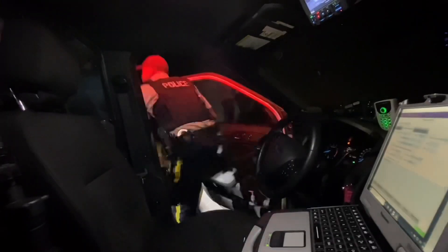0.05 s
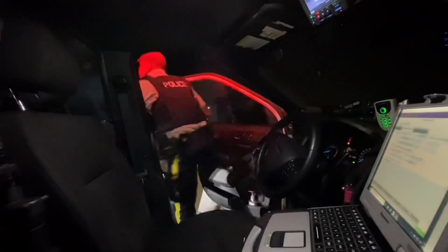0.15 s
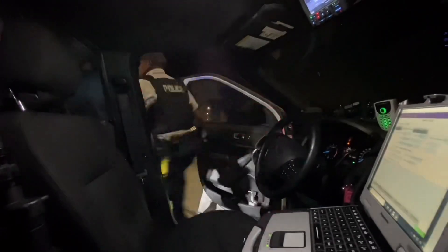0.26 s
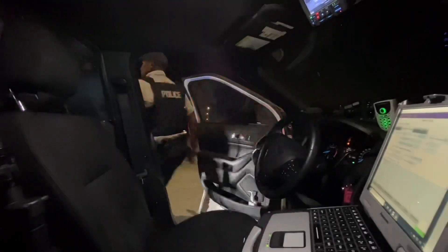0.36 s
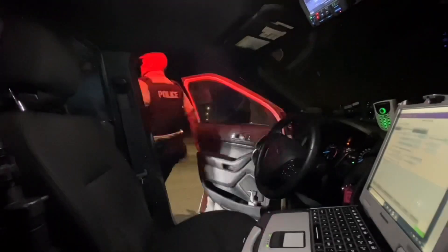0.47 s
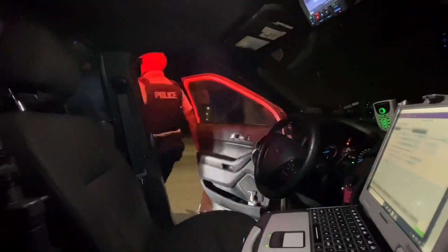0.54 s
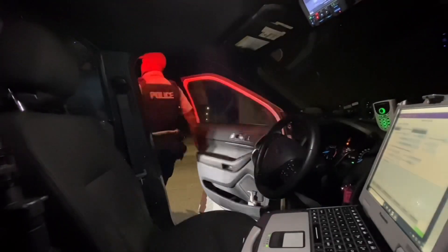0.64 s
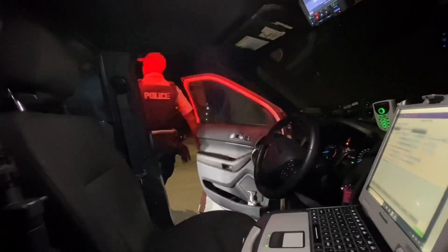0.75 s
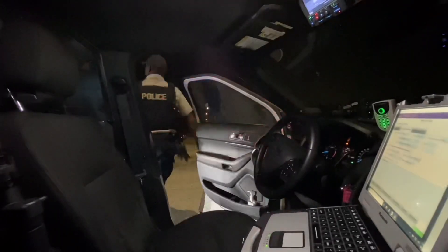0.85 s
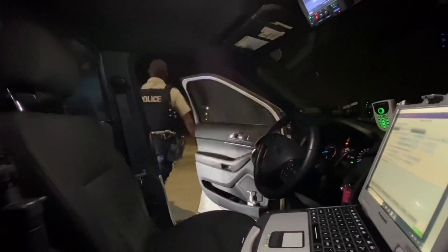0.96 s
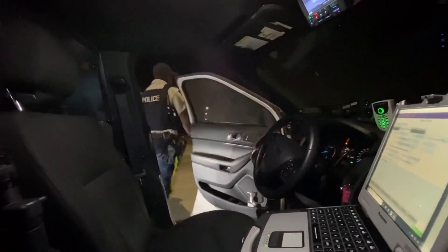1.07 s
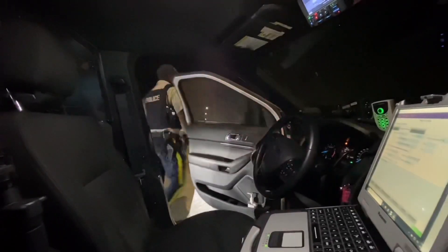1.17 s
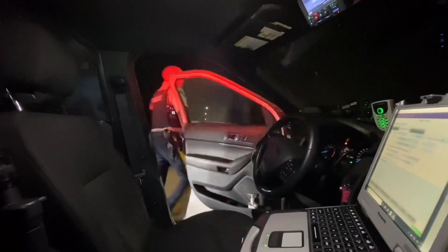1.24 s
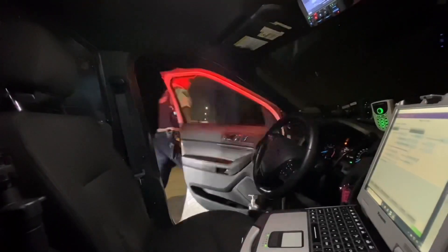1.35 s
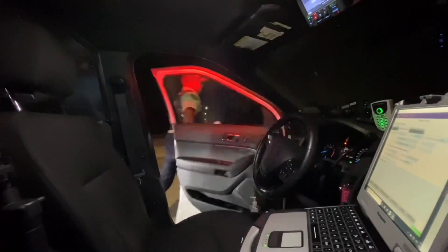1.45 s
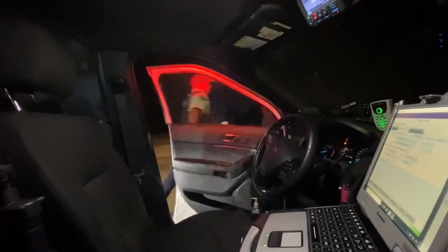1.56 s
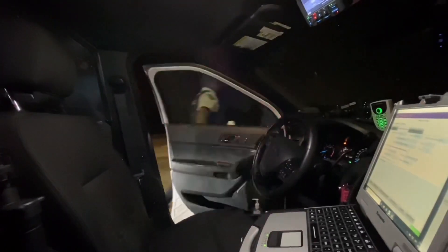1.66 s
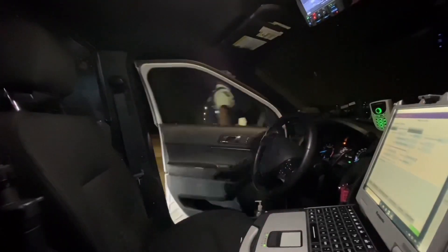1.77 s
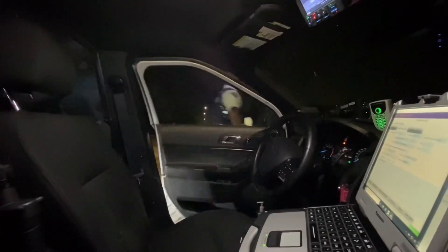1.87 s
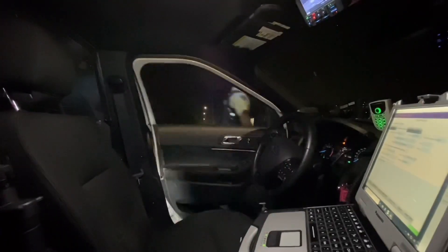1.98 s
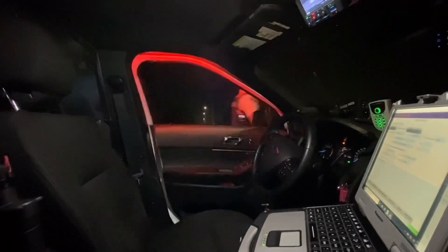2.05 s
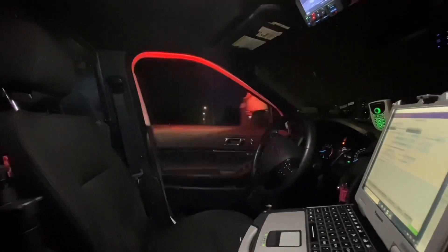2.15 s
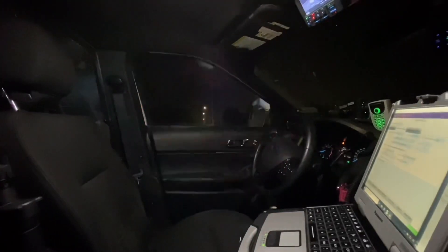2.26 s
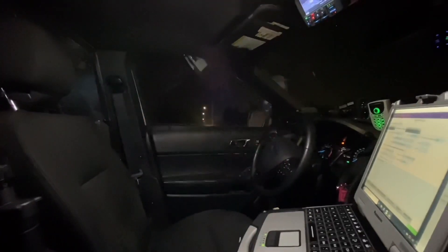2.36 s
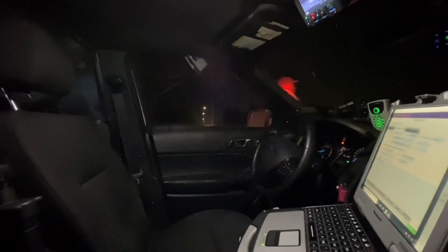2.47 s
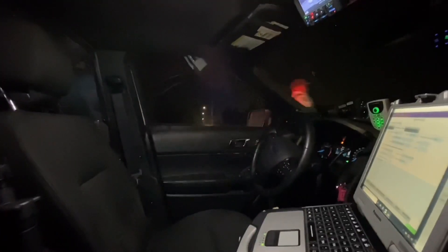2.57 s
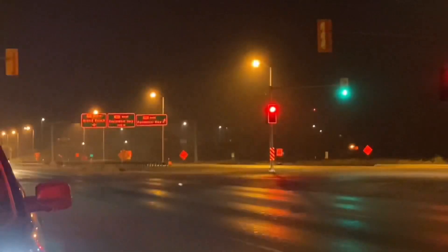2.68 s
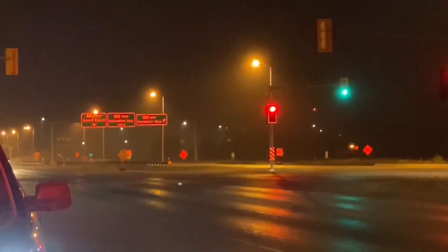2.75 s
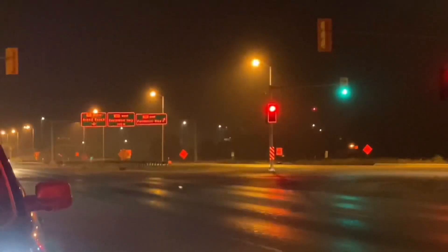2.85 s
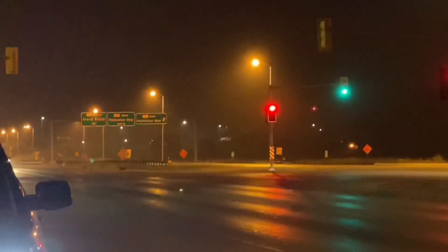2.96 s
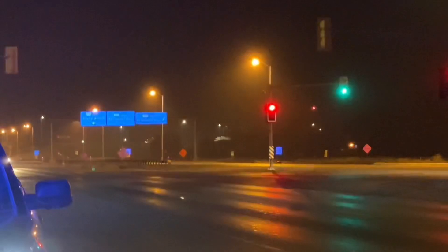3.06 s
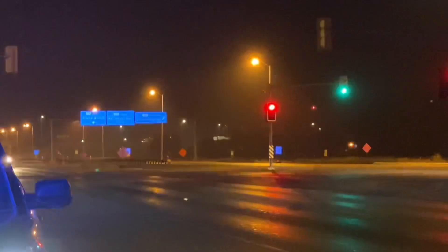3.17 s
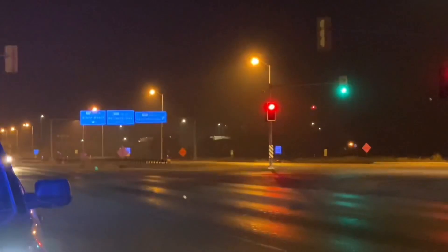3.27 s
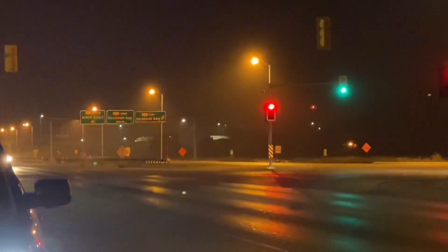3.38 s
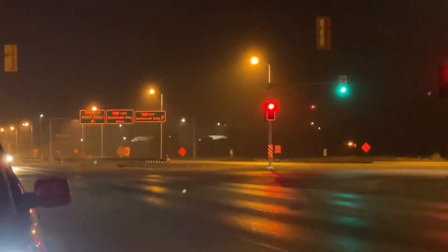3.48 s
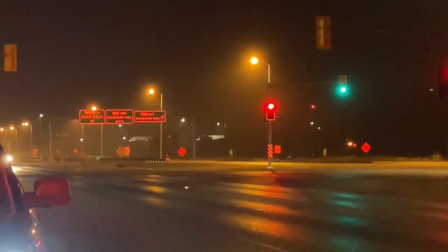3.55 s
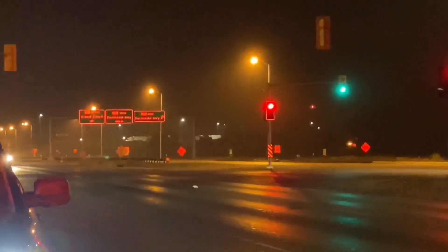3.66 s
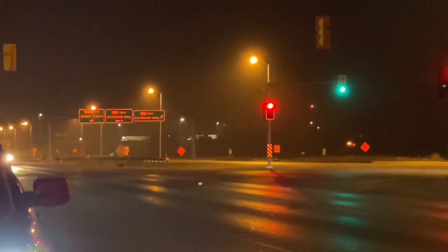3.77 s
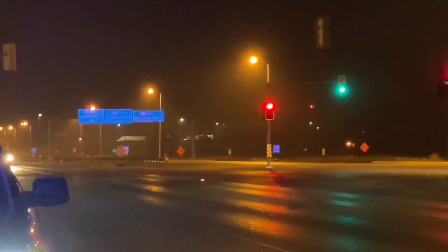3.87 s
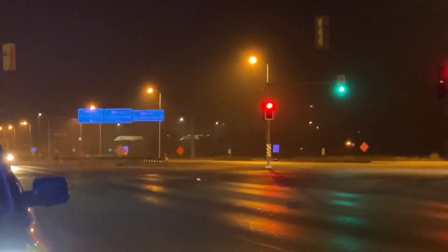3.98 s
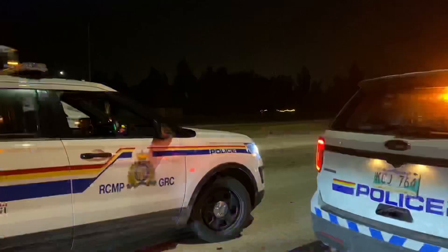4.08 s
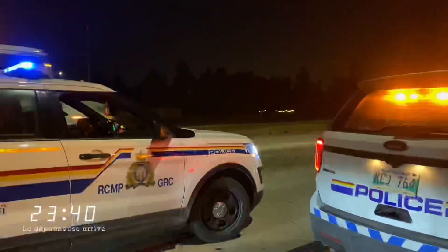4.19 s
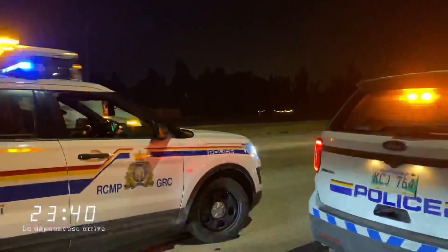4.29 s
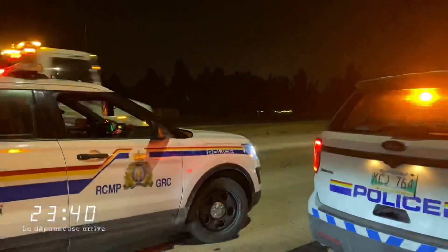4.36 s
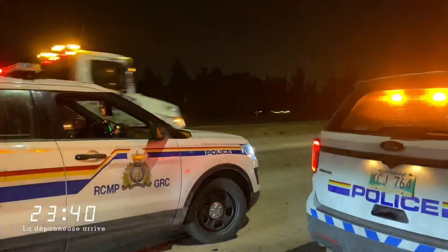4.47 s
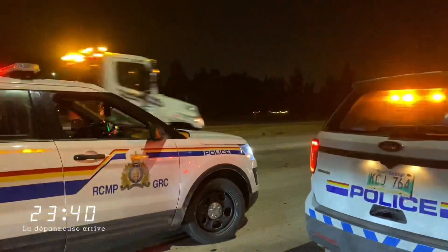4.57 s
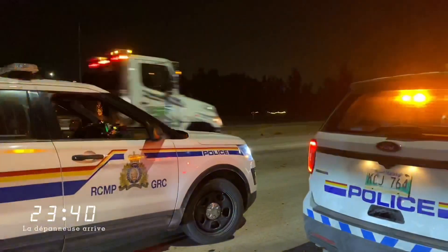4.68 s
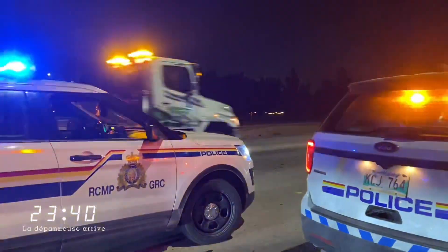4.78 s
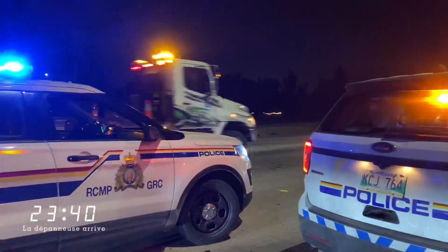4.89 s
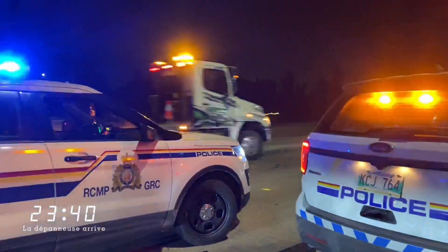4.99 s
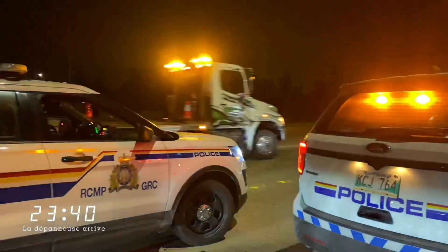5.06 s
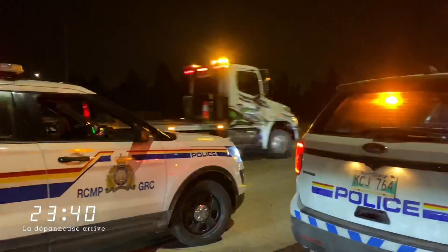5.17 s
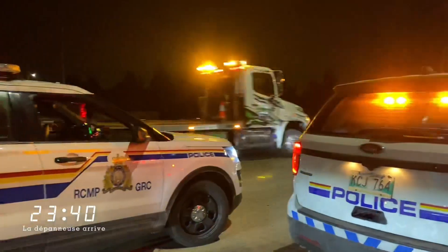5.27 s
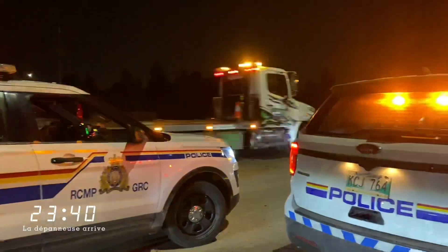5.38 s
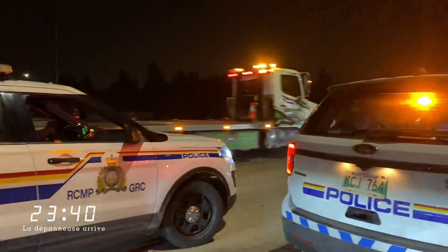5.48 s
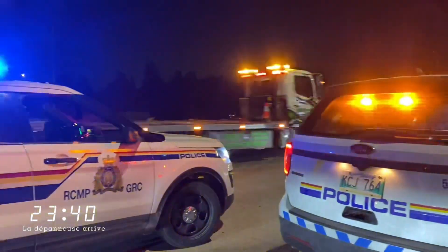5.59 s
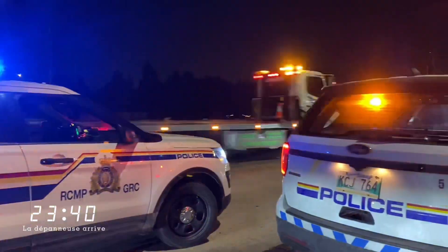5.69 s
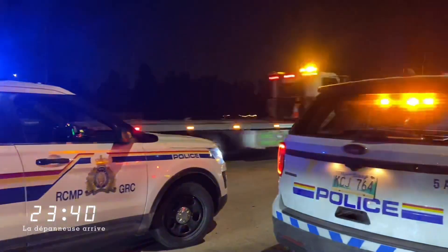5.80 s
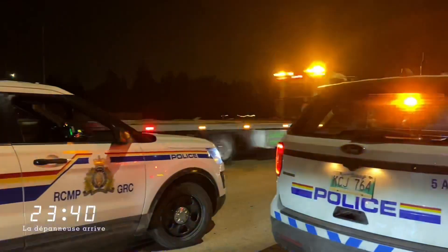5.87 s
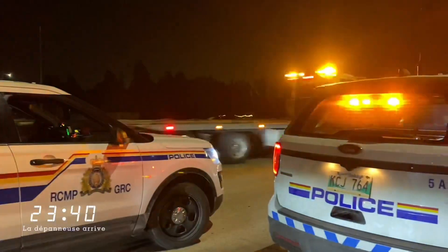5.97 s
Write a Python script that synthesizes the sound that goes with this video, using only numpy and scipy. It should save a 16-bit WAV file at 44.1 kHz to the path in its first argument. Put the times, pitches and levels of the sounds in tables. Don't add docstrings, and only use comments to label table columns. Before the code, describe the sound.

Inside a parked car at night, wet road noise comes through the open door on the right with small gear clicks and cloth scuffs. The door slams with a latch crash, deep boom and rattling trim and glass. A hard cut leads to idling engines and two close hollow knocks, then another to a heavy truck growling, easing off and rolling by on hissing tyres.

```python
import sys
import numpy as np
from scipy import signal
from scipy.fft import rfft, irfft, next_fast_len
from scipy.io import wavfile
from scipy.ndimage import uniform_filter1d, map_coordinates

SR = 44100
rng = np.random.default_rng(int(sys.argv[2]) if len(sys.argv) > 2 else 0)


def magnitude_from_level(level_db):
    exponent = np.asarray(level_db, float) / 20
    return 10 ** exponent


def store_pcm(level_fs):
    pcm = np.round(np.clip(level_fs, -1, 1) * 32767).astype(np.int16)
    wavfile.write(sys.argv[1], SR, np.atleast_2d(pcm).T)


N = 266083
T = np.arange(N) / SR


def unit(x):
    return x / np.sqrt(np.mean(x ** 2) + 1e-20)


def along(points, hz):
    f, v = np.transpose(points)
    return np.interp(np.log(hz + 1), np.log(f + 1), v)


def wobble(rate):
    return map_coordinates(rng.standard_normal(int(N * rate / SR) + 4), [T * rate])


def bump(s, wide):
    return np.exp(-.5 * ((T - s) / wide) ** 2)


def ramp(start_s, length_s):
    return np.clip((T - start_s) / length_s, 0, 1)


def sides(pan_db):
    return magnitude_from_level(np.array([[.5], [-.5]]) * pan_db)


def late(x, samples):
    return np.pad(x, (samples, 0))[:-samples]


def add(out, s, x):
    k = round(s * SR)
    out[:, k:k + x.shape[-1]] += x[..., :N - k]


def ring(hz, t60, rise, length=.4):
    t = T[:int(length * SR)]
    return np.sin(2 * np.pi * hz * t) * magnitude_from_level(-60 * t / t60) * (1 - np.exp(-t / rise))


def rush(spectrum, alike, patchy_db, pan=((1, 0),), lag=0, n=next_fast_len(N)):
    z = signal.stft(rng.standard_normal((2, n)), nperseg=512)[2]
    field = uniform_filter1d(rng.standard_normal(z.shape[1:]), 6, 0)
    field = uniform_filter1d(field, 12, 1)
    patchy = signal.istft(z * magnitude_from_level(patchy_db * unit(field)), nperseg=512)[1]
    pair = rfft(patchy[:, :n])
    hz = np.fft.rfftfreq(n, 1 / SR)
    turn = np.arccos(np.clip(along(alike, hz), -.99, 1)) / 2
    mid, side = pair * magnitude_from_level(along(spectrum, hz)) * [np.cos(turn), np.sin(turn)]
    left = (mid + side) * np.exp(-2j * np.pi * hz * lag)
    both = irfft(np.array([left, mid - side]) * sides(along(pan, hz)), n)[:, :N]
    return both / np.std(both.mean(0))


def hum(lines, lag_turn):
    out = np.zeros((2, N))
    for hz, db in lines:
        turn = 2 * np.pi * hz * T + 0.42 * wobble(9)
        out += magnitude_from_level(db + 1.5 + 3.8 * wobble(6)) * np.sin(turn - np.array([[lag_turn], [0]]))
    return out


# pitch_hz, level_db [dB per Hz]
CABIN_LOW = [(12, -40), (20, -2.5), (43, -4.5), (92, -1.5), (129, -14), (167, -16), (199, -19), (280, -35),
             (360, -28), (620, -120)]
CABIN_ROAD = [(150, -37), (250, -6.5), (296, -4.5), (399, -2), (500, -7.5), (606, -15), (762, -3.5),
              (859, -10.5), (968, -4), (1060, -8), (2000, -10), (2700, -16.5), (3510, -61), (5940, -120)]
CABIN_SPRAY = [(1800, -51), (2500, -4), (3000, 6), (4400, 2), (5100, -3), (5280, -4), (5420, -19),
               (5560, -7), (5900, -4), (6250, -8), (6420, 1), (6650, -6.5), (7400, -5), (7700, -14),
               (8000, -7), (10500, -9), (11900, -16.5), (12250, -22), (12500, -50)]
# pitch_hz, level_db [dB per Hz]
WHINE = [(6200, -60), (6350, -4), (6420, -2), (6500, -4), (6650, -60)]
# pitch_hz, likeness [-1 to 1, clipped]
CABIN_ALIKE = [(60, 1), (130, -1.67), (300, 1.5), (640, 0.18), (1400, -0.27), (3100, 0.3), (6800, 0.5),
               (15000, -0.5)]
# pitch_hz, left_minus_right_db
CABIN_PAN = [(60, -2), (110, -11.5), (200, -5), (380, -11.5), (700, 0), (1290, -4), (2380, -2), (4400, 0),
             (8120, -4), (15000, -1)]
ROAD_LAG_S = 42 / SR


def doorway():
    swing_s, shut_s = 1.17, 2.44
    gap_db = -9.5 * ramp(swing_s, shut_s - swing_s) ** 2
    shut = ramp(shut_s, 0.12)
    seal_db = -1.5 * shut
    rustle_db = 4 * bump(0.24, 0.24)

    low_db = -41.5 + 0.19 * gap_db + 0.71 * wobble(6.68)
    road_db = -54 + gap_db + seal_db + 1.45 * wobble(8.86)
    spray_db = -65 + 1.64 * gap_db + rustle_db + seal_db + 0.24 * wobble(9.9)
    whine_db = -81.5 + 0.43 * gap_db + 5 * shut + 3.5 * wobble(11.9)

    low = magnitude_from_level(low_db) * rush(CABIN_LOW, CABIN_ALIKE, 0.38, CABIN_PAN, lag=85 / SR)
    road = magnitude_from_level(road_db) * rush(CABIN_ROAD, CABIN_ALIKE, 0.9, CABIN_PAN, lag=ROAD_LAG_S)
    spray = magnitude_from_level(spray_db) * rush(CABIN_SPRAY, CABIN_ALIKE, 1.3, CABIN_PAN, lag=-20 / SR)
    return low + road + spray + magnitude_from_level(whine_db) * rush(WHINE, CABIN_ALIKE, 1.6)


# pitch_hz, level_db [dB per Hz]
CROSS_LOW = [(12, -25), (20, -25), (32, -9.5), (68, -6), (81, 0.5), (119, -11), (157, -7), (195, -18),
             (260, -15), (340, -29), (570, -120)]
CROSS_MID = [(140, -14), (230, -3), (351, 14), (403, 1.5), (480, -7), (620, -34), (1060, -120)]
CROSS_HISS = [(260, -16), (450, -1.5), (490, 3), (830, -1.5), (1010, -2.5), (1090, -4), (2060, -13.5),
              (2280, -18.5), (2780, -14.5), (3970, -20.5), (5910, -23.5), (8440, -28.5), (10600, -29.5),
              (12250, -45), (12500, -46), (13300, -52), (14400, -60), (15000, -56), (15700, -58)]
# pitch_hz, likeness [-1 to 1]
CROSS_ALIKE = [(60, 0.9), (130, 0.77), (290, 0.93), (640, 0.065), (1410, 1), (3100, 0.96), (7800, 0.97),
               (8200, 0), (10100, 0.1), (10400, .995), (11650, .995), (11900, .2), (12600, -.8),
               (13500, -.8), (14500, .9)]
# pitch_hz, level_db
CROSS_HUM = [(60, -44), (116, -44.5), (150, -49.5), (173, -55), (215, -55), (300, -55), (352, -58)]


def waiting_traffic():
    sag_s = 3.3
    beat = np.sin(np.pi * 2.35 * (T - 3.02))
    idle = magnitude_from_level(-32 - 7 * bump(sag_s, 0.23)) * beat
    exhaust_db = -48.5 + 3.5 * (T - sag_s)
    out = magnitude_from_level(-36 - 2.5 + 0.53 * wobble(6.5)) * rush(CROSS_LOW, CROSS_ALIKE, patchy_db=0.5)
    out += hum(CROSS_HUM, 0.34)
    out += magnitude_from_level(2.0) * idle * np.sin(2 * np.pi * 85.5 * T + 0.21 * wobble(8.3))
    out += magnitude_from_level(exhaust_db) * rush(CROSS_MID, CROSS_ALIKE, patchy_db=-1.5)
    out += magnitude_from_level(-49.5 + 3 + .4 * wobble(8)) * rush(CROSS_HISS, CROSS_ALIKE, patchy_db=.6)
    return out


# start_s, level_db, pitch_hz, swell_s
KNOCKS = [
    (3.5935, -16.5, 670, 0.00095),
    (3.8555, -7.5, 680, 0.00075),
]
# delay_s, level_db
ECHOES = [
    (.0155, -21),
    (.0195, -23),
    (.0255, -24),
    (.035, -26),
    (.043, -32),
]


def knocks():
    out = np.zeros((2, N))
    t = T[:8192]
    for s, db, hz, swell in KNOCKS:
        u = t / swell
        knock = u ** 3 * np.exp(3 - u) / 3 ** 3 * np.sin(2 * np.pi * hz * t)
        for delay, echo_db in ECHOES:
            add(out, s + delay, magnitude_from_level(db + echo_db) * knock[None])
        knock += magnitude_from_level(-15.5) * ring(1080, 0.018, .001)[:8192]
        knock[70:] -= 0.42 * ring(215, 0.028, 0.0006)[:8192 - 70]
        add(out, s, magnitude_from_level(db) * np.array([late(knock, 12), knock]))
        scatter = [(350, -43), (500, 15.0), (700, 13), (950, 2), (1300, -43), (2000, -90)]
        echo = rush(scatter, [(1, 0.89)], 0, n=8192)
        add(out, s + 0.01304, magnitude_from_level(db - 35 - 60 * t / 0.29) * np.clip(t / 0.0018, 0, 1) * echo)
    return out


def crossing():
    return waiting_traffic() + knocks()


PULL_S, LIFT_S = 4.083, 4.735
BURBLE_S = 4.87
PIPE_S = 4.45
# order [multiple], level_db
ORDER = [(1.5, -22), (2, -23), (3, -22), (4, -30), (5, -34), (6, -35)]


def firing_note(turn, coasting):
    load_db = -5.5 * np.exp(-np.abs(T - PULL_S) / 0.07)
    note = magnitude_from_level(-22 + load_db - 150 * coasting) * ramp(PULL_S, 0.018)
    note = note + magnitude_from_level(-29) * bump(BURBLE_S, 0.009)
    pull = note * magnitude_from_level(0.38 * wobble(28))
    stack = np.sin(turn)
    for k, db in ORDER:
        bloom_db = 2 * bump(PIPE_S, 0.06) if k > 2 else 0
        phase = k * turn[1] + turn - turn[1] + .35 * wobble(9)
        stack = stack + magnitude_from_level(db + bloom_db + 1.6 * wobble(8)) * np.sin(phase)
    return np.sqrt(2) * pull * stack * sides(-1.4)


# pitch_hz, level_db [dB per Hz]
TRUCK_LOW = [(12, -54), (20, -43), (41, -1), (70, 3), (124, 0.5), (151, -8.5), (199, -11.5), (242, -15),
             (272, -38), (320, -20), (420, -36), (700, -120)]
TRUCK_MID = [(160, -3), (280, 0), (440, -5), (480, -3), (706, -3.5), (1040, -4.5), (1660, -11),
             (1940, -15.5), (2200, -11), (2800, -46), (3640, -60), (6160, -120)]
TRUCK_TYRE = [(1000, -48), (1600, -2), (1950, -9), (2300, 1), (2830, -4), (3770, -4), (4530, -5.5),
              (5490, -12.5), (7200, -11), (8250, -11), (10600, -17), (12250, -27), (12500, -32),
              (13800, -35), (14500, -41), (15000, -35), (15600, -37)]
# pitch_hz, likeness [-1 to 1]
TRUCK_ALIKE = [(60, 0.86), (130, 0.9), (290, 1), (640, 0.18), (1410, 0.53), (3100, 0.37), (6600, 0.4),
               (7600, 0), (7950, -.93), (8750, -.93), (9100, -.2), (10200, .2), (10400, .995),
               (11650, .995), (11900, .3), (12600, -.9), (13800, -.9), (14600, .8)]
# pitch_hz, level_db
TRUCK_HUM = [(59, -51.5), (85, -50), (124, -43.5), (160, -55.5)]
# pitch_hz, level_db
TURBINE = [(248, -46)]


def truck():
    coasting = np.clip(T - LIFT_S, 0, None)
    hz = 58 - 1.2 * (T - PULL_S) - 8.5 * np.minimum(coasting, .15)
    turn = 2 * np.pi * np.cumsum(hz) / SR - np.array([[.3], [0]])

    jolt_db = 5.5 * bump(5.413, 0.0089)
    low_db = -36 + jolt_db + 3.5 * bump(BURBLE_S, 0.14) - 3.3 * bump(PIPE_S, 0.068)
    engine_db = -41.5 + .5 * jolt_db - 2 * np.clip(coasting / 0.16, 0, 1)
    tyre_db = -55.5 + jolt_db + 4.5 * bump(5.33, 0.21) + 3.3 * bump(PULL_S, 0.12)
    throb = np.sin(turn)

    out = firing_note(turn, coasting)
    low = rush(TRUCK_LOW, [(1, 0.91)], patchy_db=-0.5, lag=0.00055)
    out += magnitude_from_level(low_db - 1.5 + 1.14 * wobble(2.104)) * low
    out += hum(TRUCK_HUM, 0.27)
    out += magnitude_from_level(-6 * ramp(PULL_S, 0.72)) * hum(TURBINE, 0.25)
    roar_pan = [(200, -2), (500, -4.5), (1000, -1), (1500, 0)]
    out += magnitude_from_level(engine_db + .5 + .8 * throb) * rush(TRUCK_MID, TRUCK_ALIKE, 1.2, roar_pan)
    out += magnitude_from_level(tyre_db + .3 * throb) * rush(TRUCK_TYRE, TRUCK_ALIKE, patchy_db=.7)
    return out


# start_s, level_db
# [peak], pitch_hz, crack_db, crack_t60_s
GEAR = [(0.021, -45.5, 1560, -1, 0.035), (.048, -46.5, 3720, -1, 0.019), (.199, -30.5, 1254, -2, 0.061),
        (.2, -41, 3400, -22, .02), (.201, -40, 4060, -23, .02), (.255, -50, 2360, -2, 0.031),
        (0.314, -40, 1720, -5.5, 0.043), (.319, -43, 1660, -12, .03), (0.326, -43, 1110, -8, 0.33),
        (.316, -49, 4200, -12, .02), (.408, -47, 6600, -12, .02), (.332, -48, 705, -9, .04),
        (0.4035, -36.5, 2010, -2.5, 0.025), (0.406, -37, 1520, -5.5, 0.11), (0.641, -43, 1650, -9, 0.03),
        (0.995, -51, 2640, -9, .03), (.2, -39, 6900, -20, .02), (0.328, -46, 1500, -10, .02),
        (2.678, -48, 700, 10, 0.0064), (4.083, -32, 870, -10, 0.011), (5.407, -41, 6340, 6, 0.036)]


def gear():
    out = np.zeros((2, N))
    spectrum = [(500, -4.0), (1500, -3), (5000, -1.0), (11000, -4.0), (12200, -11), (13000, -50), (15700, -50)]
    t = T[:8192]
    for s, db, hz, crack_db, crack_t60 in GEAR:
        crack = rush(spectrum, [(1, 0.18)], 0, n=8192)
        crack = magnitude_from_level(crack_db - 4.5 - 60 * t / crack_t60) * crack * np.clip(t / 0.00087, 0, 1)
        add(out, s, magnitude_from_level(db) * sides(-3) * (ring(hz, 0.033, 0.00071)[:8192] + crack))
    return out


# start_s,
# level_db [peak], pitch_hz, t60_s, left_minus_right_db
TRIM = [(2.326, -18.5, 500, 0.047, -13), (2.331, -21, 2400, 0.024, -5), (2.305, -34, 400, .06, -11),
        (2.333, -22, 802, 0.046, 0), (2.331, -18.5, 265, 0.054, -11), (2.433, -42, 1800, .06, -3),
        (2.44, -45, 1550, .05, -3), (2.4815, -39, 580, 0.033, 0), (2.3305, -22.5, 1590, 0.023, -2),
        (2.331, -18, 2100, 0.036, -4), (2.343, -26, 2380, 0.028, -2), (2.304, -32, 790, .04, 0),
        (2.367, -27, 1600, .03, -3), (2.386, -36, 1600, .04, -3), (3.607, -38, 850, .03, 0),
        (0.27, -49, 2100, .02, -2), (2.309, -30, 190, .07, -12), (2.328, -22, 320, .04, -8),
        (2.344, -31, 650, 0.06, -8), (2.58, -39, 420, .025, 12), (2.453, -42, 710, 0.059, 0),
        (2.665, -49, 700, .03, 5), (2.836, -36, 750, 0.044, 0), (.9935, -41, 1550, .014, -2),
        (.994, -37, 2030, .018, -2), (.993, -38.5, 3200, .018, 5), (1.004, -48, 3500, .015, -2),
        (1.011, -48, 1850, .02, -2), (2.345, -39, 600, .1, -6), (2.388, -35, 402, 0.08, -6),
        (2.412, -30, 412, 0.053, -6), (2.482, -30.5, 420, 0.056, 7), (2.495, -34, 350, 0.049, -6),
        (2.516, -42.5, 650, 0.024, 24), (2.517, -40, 1400, 0.0092, 16), (2.5795, -29.5, 1450, 0.0091, 17),
        (3.3, -49, 1050, 0.018, 5), (2.613, -43.5, 720, .04, 16), (2.618, -47, 750, 0.042, 14.5),
        (2.646, -44, 690, 0.019, 18), (2.798, -36, 960, 0.008, 15)]


def trim():
    out = np.zeros((2, N))
    for s, db, hz, t60, pan_db in TRIM:
        add(out, s, magnitude_from_level(db) * sides(pan_db) * ring(hz, t60, 0.00069))
    return out


# pitch_hz, t60_s
PANEL_T60 = [(200, 0.84), (800, 0.43), (2500, 0.41), (6000, 0.43), (12000, 0.35)]
# pitch_hz, likeness [-1 to 1]
PANEL_ALIKE = [(100, 0.65), (500, 0.61), (1050, -0.23), (1600, 0.37), (3000, 0.13), (8000, -0.14)]
# pitch_hz, left_minus_right_db
PANEL_PAN = [(180, -12), (400, -3), (750, -3), (1600, -2.5), (3200, -2)]


def burst(out, s, db, rise, factor, spectrum):
    noise = rush(spectrum, PANEL_ALIKE, 0, PANEL_PAN, ROAD_LAG_S, n=16384)
    hz, t, z = signal.stft(noise, SR, nperseg=128)
    t60 = factor * along(PANEL_T60, hz)[:, None]
    dying = signal.istft(z * magnitude_from_level(-60 * t / t60), SR, nperseg=128)[1]
    add(out, s, magnitude_from_level(db) * dying[:, :16384] * np.clip(T[:16384] / rise, 0, 1))


# pitch_hz, level_db [dB per Hz]
PANEL = [(150, -15.5), (250, -12.5), (526, -6.5), (682, -15), (783, -2.5), (963, -10), (1190, -7.5),
         (2370, -16.5), (3020, -20), (3840, -24), (4700, -25), (5400, -31.5), (6700, -30.5), (7600, -33),
         (10500, -33.5), (12300, -44), (12600, -62), (15600, -60)]


def tilted(tilt_db):
    return [(hz, level + tilt_db * np.log2(hz / 1000)) for hz, level in PANEL]


# start_s, level_db [rms], rise_s, brightness_db [per octave]
SCUFFS = [
    (.175, -49, 0.018, 15),
    (0.234, -49, 0.017, 12),
    (0.313, -46.5, .003, -1.5),
    (0.327, -61, .0035, -5),
    (.342, -60, .006, 14),
    (0.968, -54, 0.002, 4),
    (1.255, -63, .003, 5),
    (0.992, -50.5, 0.0016, 2.5),
    (1.004, -54, .002, 1),
]


def scuffs():
    out = np.zeros((2, N))
    for s, db, rise, tilt_db in SCUFFS:
        burst(out, s, db, rise, .4, tilted(tilt_db))
    return out


# pitch_hz, width_hz, level_db
GLASS = [(4090, 1100, 0), (5100, 470, -6), (6600, 580, -0.5), (8340, 600, -6), (10100, 1600, -9)]
# start_s, level_db [rms]
RATTLE = [
    (2.458, -54),
    (2.511, -52),
    (2.5655, -52.5),
    (2.6145, -52),
    (2.6635, -55),
]


def window_rattle():
    out = np.zeros((2, N))
    hz = np.geomspace(100, 12300, 200)
    power = sum(magnitude_from_level(2 * db) / (1 + (2 * (hz - c) / w) ** 2) for c, w, db in GLASS)
    pane = list(zip(hz, 10 * np.log10(power))) + [(12500, -70)]
    for s, db in RATTLE:
        burst(out, s, db, 0.0021, 0.2, pane)
    return out


def snap():
    out, t = np.zeros((2, N)), T[:4096]
    turns = 675 * t + .52 * (1 - np.exp(-t / .0007))
    x = magnitude_from_level(-16 - 60 * t / 0.025) * (1 - np.exp(-t / 0.0011)) * np.sin(2 * np.pi * turns)
    add(out, 2.5793, np.array([x, magnitude_from_level(-14) * late(x, 36)]))
    return out


# pitch_hz, level_db, t60_s
SKIN = [(802, 3, 0.12), (1044, -6, 0.11), (1170, 1, 0.14), (1410, -4, 0.11), (1540, -8, 0.15),
        (2250, -14, 0.19), (2370, -5, 0.12), (2480, -6.5, 0.14), (3200, -8, 0.12), (3530, -16, 0.25),
        (3700, -8, 0.17), (3900, -7, 0.19), (4000, -18, 0.34), (4770, -19, 0.23)]
# start_s, level_db
SKIN_BLOWS = [
    (2.3245, -30),
    (2.3309, -25.5),
    (2.3345, -29),
    (2.345, -34),
    (2.366, -40),
    (2.386, -50),
    (2.435, -55),
]


def skin():
    out, t = np.zeros((2, N)), T[:12000]
    for s, db in SKIN_BLOWS:
        for hz, level_db, t60 in SKIN:
            lead = np.array([[2.2 + 0.58 * rng.standard_normal()], [0]])
            turn = 2 * np.pi * (hz * t + rng.random()) + lead
            uneven_db = 2.5 * rng.standard_normal((2, 1))
            size = magnitude_from_level(db + level_db + uneven_db - 60 * t / (0.84 * t60))
            add(out, s, size * np.sin(turn) * (1 - np.exp(-t / .0007)))
    return out


# start_s, level_db, pitch_hz, t60_s
LATCH = [
    (2.3625, -29, 3100, .035),
    (2.366, -29, 3900, .045),
    (2.374, -33.5, 3960, .06),
    (2.3245, -28, 4900, 0.014),
    (2.615, -55, 4100, 0.044),
]


def latch_springs():
    out = np.zeros((2, N))
    for s, db, hz, t60 in LATCH:
        add(out, s, magnitude_from_level(db) * ring(hz, t60, 0.00089)[None])
    return out


# start_s, level_db, pitch_hz, t60_s, sign [+1 or -1]
BOOMS = [(2.249, -32, 46, 1, 1), (2.307, -30, 110, 0.16, 1), (2.335, -29, 30.2, 0.6, 1),
         (2.329, -7.5, 203, 0.047, 1), (2.335, -11.5, 140.3, 0.15, 1), (2.336, -4.5, 70, 0.089, -1),
         (2.3477, -3, 63.4, 0.13, -1), (2.348, -28.5, 222, 0.25, 1), (2.375, -10.5, 53.2, 0.23, 1),
         (2.397, -7, 46.4, 0.1, 1), (2.4, -30.5, 340.5, 0.14, 1), (2.42, -4, 94, 0.065, -1),
         (2.442, -25, 156, 0.17, 1), (2.471, -14, 58, 0.24, 1), (2.505, -14, 64.61, 0.15, 1),
         (2.55, -33, 114, 0.45, 1), (2.566, -19.5, 54.7, 0.36, -1)]
# pitch_hz, left_minus_right_db
BOOM_PAN = [(50, -6.5), (70, -7.5), (110, -9), (140, -9.5), (210, -11), (330, -12.5)]


def body_booms():
    out = np.zeros((2, N))
    for s, db, hz, t60, sign in BOOMS:
        boom = ring(hz, t60, 0.002, .6)
        rocking = s > 2.46 and hz < 80
        pan_db = -1 if rocking else along(BOOM_PAN, hz)
        add(out, s, magnitude_from_level(db) * sides(pan_db) * np.sign(sign) * np.array([late(boom, 50), boom]))
    return out


# start_s, level_db [rms], rise_s, decay [factor], brightness_db [per octave]
SLAM = [(2.296, -30, 0.02, 1.05, -7.5), (2.3071, -29, 0.0024, 0.65, -5.5), (2.311, -26, 0.0044, 0.74, -4),
        (2.316, -33, 0.0053, 0.52, 0.5), (2.3246, -23.5, 0.00088, 0.51, 3.5), (2.306, -51, 0.0011, .4, 3),
        (2.3273, -21, 0.0004, 0.1, 3), (2.331, -15.5, 0.00029, 0.1, -0.5),
        (2.3332, -19.5, 0.00029, 0.11, 0), (2.338, -41, .022, 0.79, 3), (2.387, -44, 0.0094, 0.71, -8),
        (2.428, -44, 0.007, 0.23, -1), (2.468, -55.5, .01, 0.7, 3.5), (2.48, -52.5, 0.0055, 1.3, -5)]


def slam():
    out = np.zeros((2, N))
    for s, db, rise, factor, tilt_db in SLAM:
        burst(out, s, db, rise, factor, tilted(tilt_db))
    return out


def cabin():
    door = slam() + body_booms() + latch_springs() + skin() + snap() + window_rattle()
    return doorway() + scuffs() + door


CUTS = [
    0,
    2.6785,
    4.083,
    6.0335,
]


def scene():
    out = gear() + trim()
    for shot, start, end in zip((cabin, crossing, truck), CUTS, CUTS[1:]):
        window = np.clip(np.minimum(T - start, end - T) / .00002 + .5, 0, 1)
        out += shot() * window
    return out


def roll_off(x):
    return signal.sosfilt(signal.butter(12, 15750, fs=SR, output="sos"), x)


def record(dry):
    limited = dry / (1 + np.abs(dry / .97) ** 6) ** (1 / 6)
    return roll_off(limited)


dry = scene()
out = record(dry)
store_pcm(out)
```